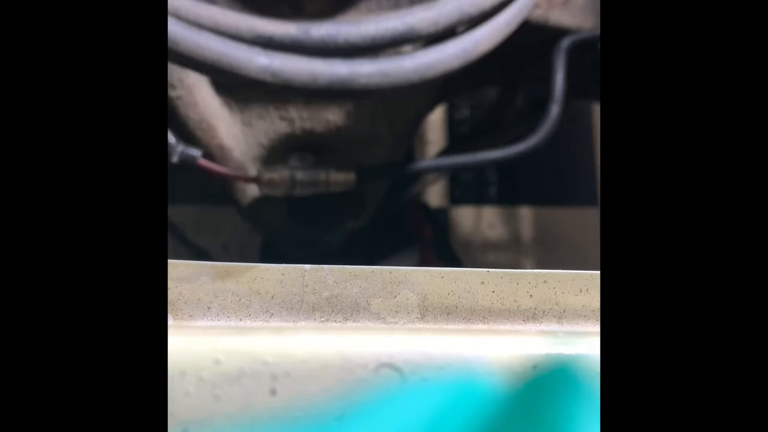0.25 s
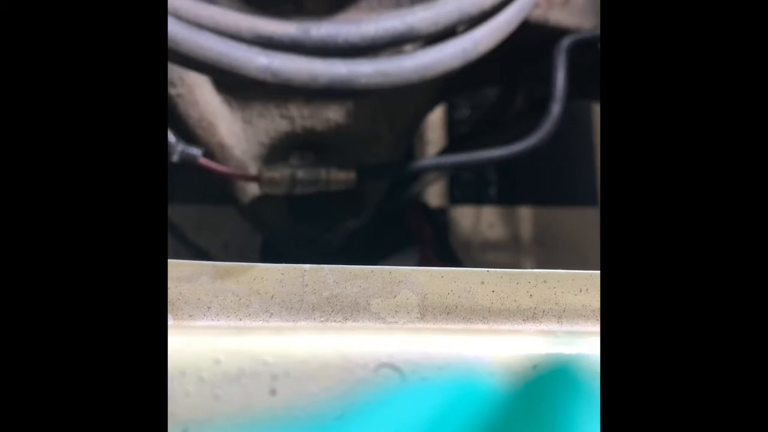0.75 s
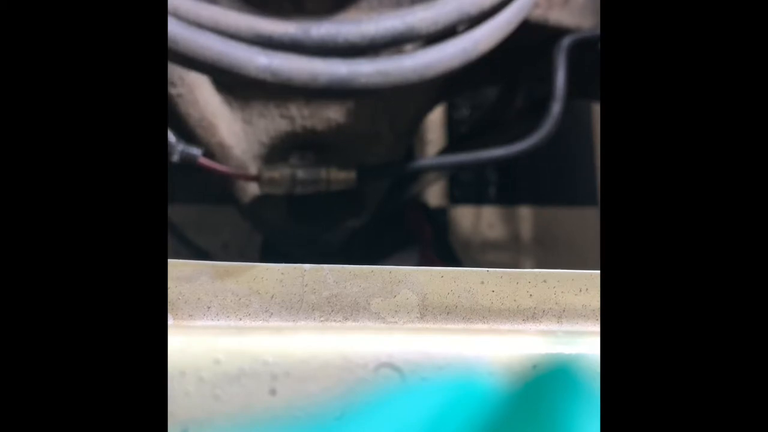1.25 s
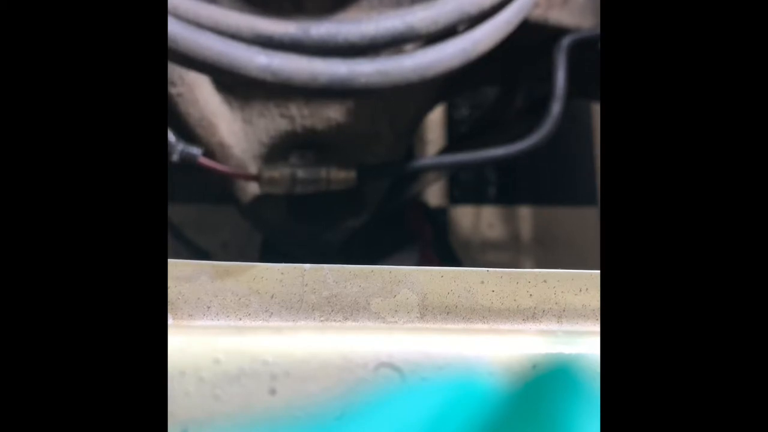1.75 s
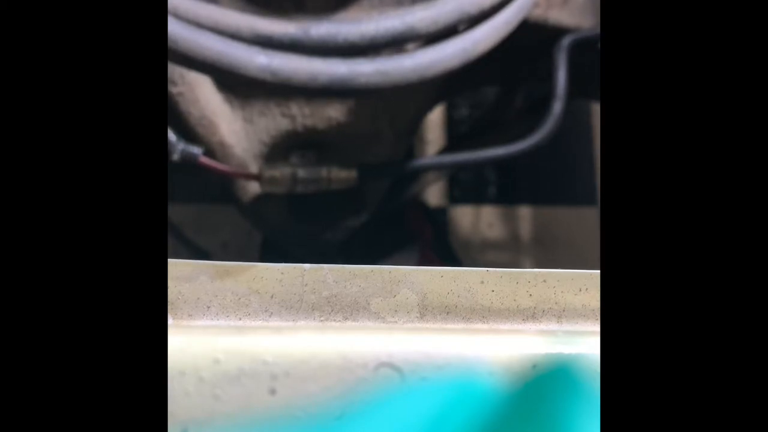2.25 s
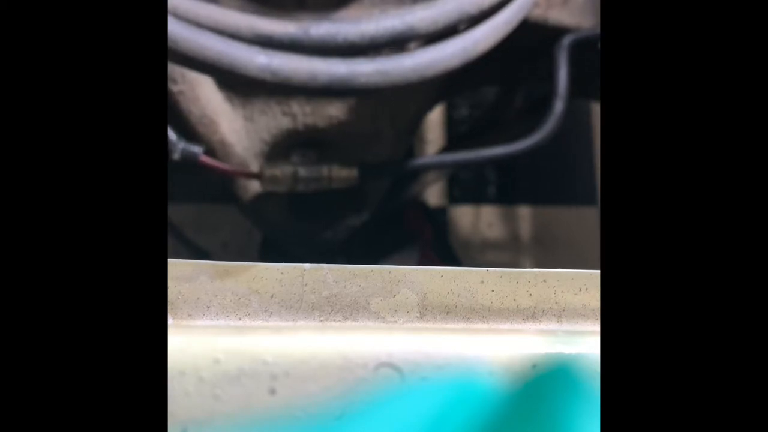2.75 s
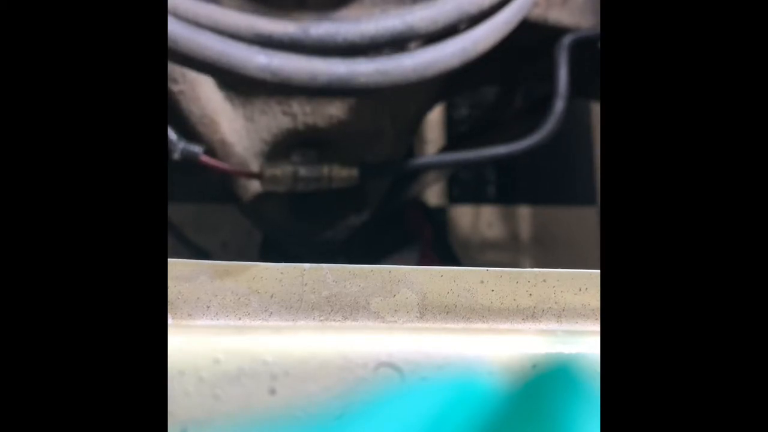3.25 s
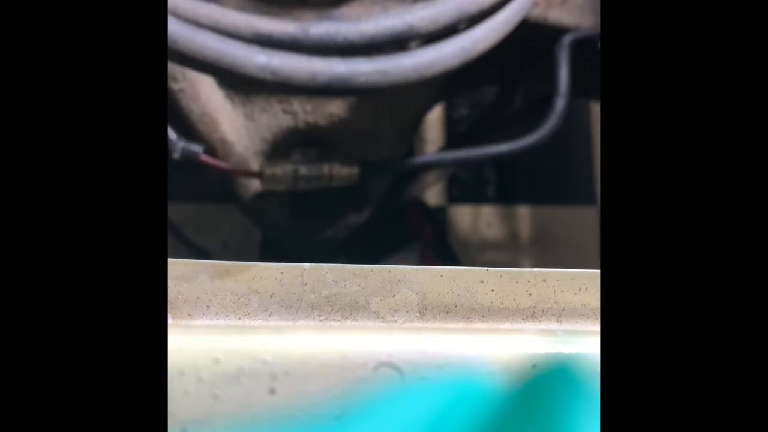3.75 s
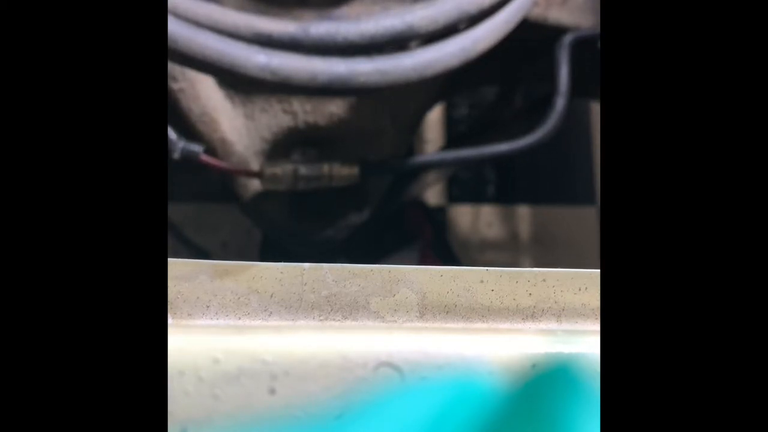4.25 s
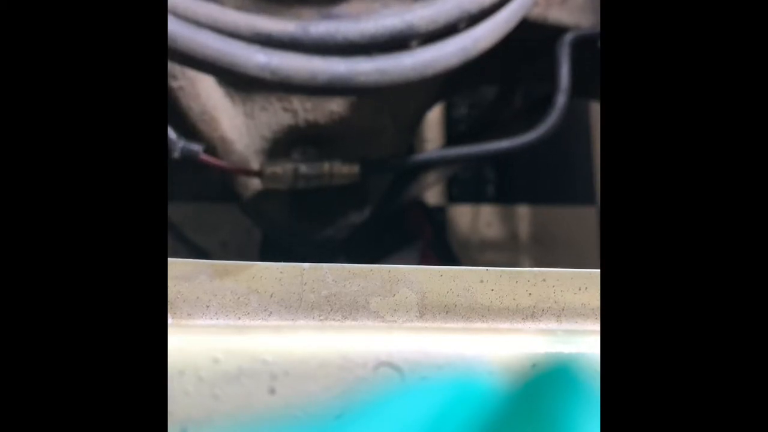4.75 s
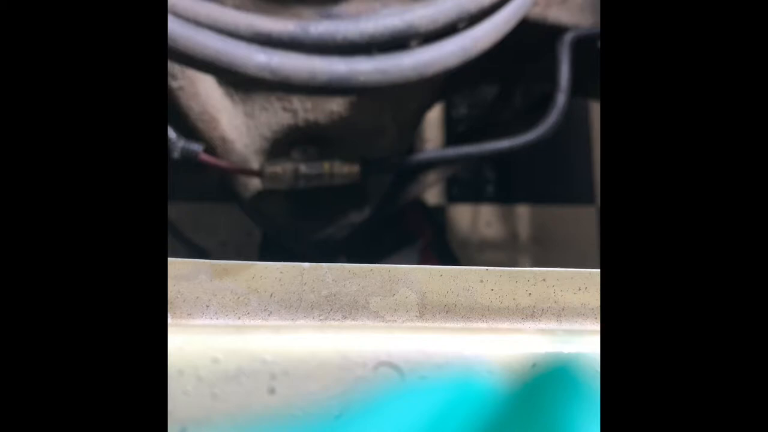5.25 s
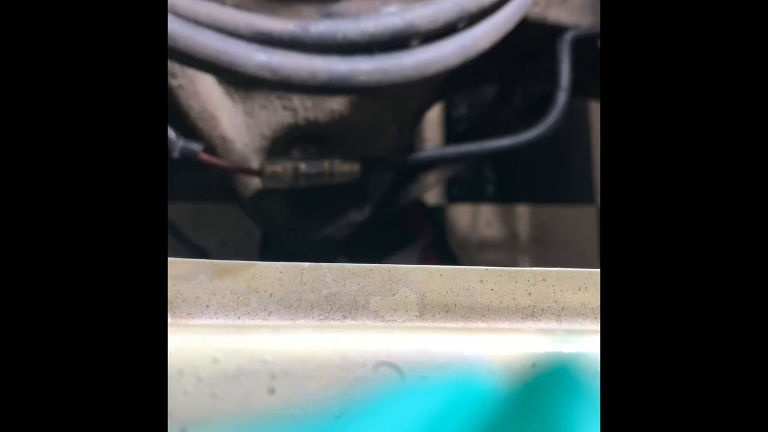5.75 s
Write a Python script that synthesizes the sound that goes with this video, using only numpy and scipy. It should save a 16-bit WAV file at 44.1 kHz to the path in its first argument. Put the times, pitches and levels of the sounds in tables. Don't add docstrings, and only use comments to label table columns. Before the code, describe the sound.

A floor jack is worked in a hard-walled garage, heard close on a phone. A faint rumble and the fading ring of an earlier blow open it. At 0.3 s a clattery knock and rub lead to a bright steel clank at 0.43, with a low spring boom; a lighter clank and firm hollow knock follow at 0.75-0.87, then hissing oil. After a lull with faint cloth rustles, a hollow knock and strong clank come at 1.55-1.65. The brightest, strongest clank lands at 2.54, followed by lighter clanks, thuds and a tiny wheel chatter near 2.8. More strong clanks fall at 3.45 and 4.3, with lighter ones at 3.75 and low thuds and a clank around 4.55-4.6. Slightly softer clanks come at 5.19 and 5.5, with a stronger oil hiss near 5.25 and a clean knock at 5.62. Scrapes, thin tube ringing and half-second reverberation link the strokes.

```python
import sys
import numpy as np
from scipy import signal
from scipy.fft import rfft, irfft
from scipy.io import wavfile
from scipy.ndimage import uniform_filter1d

SR = 44100
rng = np.random.default_rng(int(sys.argv[2]) if len(sys.argv) > 2 else 0)


def pcm_store(signal):
    levels = np.round(np.clip(np.atleast_2d(signal), -1, 1) * 32767)
    wavfile.write(sys.argv[1], SR, levels.astype(np.int16).T)


def voltage_ratio(decibels):
    exponent = np.asarray(decibels, float) / 20
    return 10 ** exponent


N = 264600


def evened(x):
    return x / np.sqrt(np.mean(x ** 2) + 1e-20)


def read(points, hz, column=1):
    rows = np.transpose(points)
    return np.interp(np.log(hz + 1), np.log(rows[0] + 1), rows[column])


def add(mix, s, sound):
    part = mix[round(s * SR):][:len(sound)]
    part += sound[:len(part)]


def filtered(x, gain):
    return irfft(rfft(x) * gain(np.fft.rfftfreq(x.shape[-1], 1 / SR)), x.shape[-1])


def mode(hz, centre_hz, width_hz):
    return 1 / (1 + 2j * (hz - centre_hz) / max(width_hz, 3))


def slips(shape, spread_db):
    return rng.standard_normal(shape) * voltage_ratio(spread_db * np.minimum(rng.exponential(1, shape), 3.5))


def drift(smooth_s):
    span = round(smooth_s * SR)
    return evened(uniform_filter1d(uniform_filter1d(rng.standard_normal(N), span), span))


def swell(start, hold, db, rise, fade):
    t = np.arange(N) / SR - start
    return voltage_ratio(db + rise * np.minimum(t, 0) - fade * np.maximum(t - hold, 0))


# f/Hz, t60/s
GARAGE = [(200, 0.99), (660, 0.55), (1700, 0.34), (4600, 0.46), (12000, 0.4)]


def garage(x):
    taps = np.zeros((2, SR))
    at = np.arange(160, SR - 20, 20) + rng.integers(0, 20, (2, (SR - 161) // 20))
    np.put_along_axis(taps, at, rng.choice([-1., 1.], at.shape), 1)
    hz, t, z = signal.stft(taps, SR, nperseg=256)
    decay = voltage_ratio(-60 * t / read(GARAGE, hz)[:, None])
    tail = signal.istft(z * decay, SR, nperseg=256)[1]
    return signal.fftconvolve(x[None], tail / np.linalg.norm(tail[0]), axes=1)[:, :N]


# t/s, hold/s, level/dB
BOOMS = [(0.369, 0.023, -40.5), (.49, 0.02, -69), (0.59, 0.1, -59), (0.795, 0.26, -69),
         (1.566, 0.043, -48.5), (1.722, 0.028, -59), (1.836, 0.2, -57), (2.105, 0.018, -56),
         (2.45, 0.11, -56), (2.533, 0.065, -43), (2.703, 0.073, -65), (2.83, 0.054, -69),
         (2.991, 0.051, -48), (3.407, 0.019, -52), (3.59, 0.22, -52), (3.888, 0.052, -49),
         (4.298, 0.035, -47), (4.394, 0.076, -60), (4.58, 0.017, -43), (4.71, 0.03, -53),
         (4.92, 0.024, -54.5), (5.288, 0.22, -55)]
BOOM_REST_DB = -62


def load():
    return voltage_ratio(BOOM_REST_DB) + sum(swell(*row, rise=500, fade=305) for row in BOOMS)


def suspension():
    boom = filtered(rng.standard_normal(N), lambda hz: mode(hz, 121.25, 17.7) ** 2)
    boom /= np.sqrt(uniform_filter1d(boom ** 2, 3000)) + 0.27 * boom.std()
    return load() * evened(boom)


# f/Hz, level/dB per Hz
HUM = [(15, -39), (25, 1), (63, 8), (114, 1.5), (248, -1), (551, -13.5), (888, -19.5), (1180, -13),
       (1430, -26), (1980, -18.5), (2560, -64), (4400, -22), (5720, -30.5), (9680, -120)]
HUM_DB, HISS_DB = -55.5, -78
STIR, STIR_FROM_DB = 0.39, -61.5


def air():
    rumble = evened(filtered(rng.standard_normal((2, N)), lambda hz: voltage_ratio(read(HUM, hz))))
    deep = filtered(rumble, lambda hz: 1 / (1 + (hz / 220) ** 3.0))
    hiss = filtered(rng.standard_normal((2, N)),
                    lambda hz: abs(1 - .6 * mode(hz, 5500, 900)) / (1 + (hz / 14300) ** 60))
    rumble = deep + (load() / voltage_ratio(STIR_FROM_DB)) ** STIR * (rumble - deep)
    return voltage_ratio(HUM_DB + 2.5 + 0.28 * drift(0.03)) * rumble + voltage_ratio(HISS_DB) * hiss


# t/s, hold/s, level/dB, fade/dB per s, valve tightness/0-1
FLOWS = [(0, 0.0215, -56.5, 99, 0.04), (.45, 0.11, -53.5, 67, 0.23), (0.799, 0.059, -44.5, 89, 0.88),
         (0.916, 0.11, -55.5, 44.5, 0.3), (1.06, 0.04, -75, 57, 0.1), (1.335, .02, -61, 150, 0),
         (1.4, 0.061, -63, 78, 0.6), (1.72, 0.062, -46, 202, .2), (1.976, 0.074, -49.5, 193.5, .9),
         (2.067, 0.092, -56.5, 121, 0), (2.164, 0.07, -65, 59.5, 0), (2.67, 0.027, -48.5, 119, 0.06),
         (2.84, 0.12, -44.5, 47, 0.5), (3.0, 0.056, -72, 97, 0.3), (3.4, 0.2, -49, 55, 0.6),
         (3.77, 0.15, -47, 98, 0.7), (4.31, 0.16, -46, 94, 0.6), (4.58, 0.02, -52.5, 207, 0.5),
         (4.72, 0.12, -51, 76, 0.6), (5.24, 0.095, -39, 249, 0.3), (5.55, 0.056, -42.5, 223, 0.6),
         (5.74, 0.071, -51, 240, 0.2)]
# f/Hz, width/Hz, level/dB, gain as the valve tightens/dB
VALVE = [(1074, 37, -1, -12.5), (1238, 143, 2.5, -9.5), (1536, 29, 0, 2), (2040, 110, -9.5, 14.5),
         (2400, 270, -12.5, 4.5), (2990, 150, -13.5, -2), (4390, 40, -6.5, 8.5)]
SEEP_DB = -89.5


def oil():
    jet = slips(N, 1.5) * voltage_ratio(2.5 * drift(0.0096))
    tight = sum(share * swell(s, hold, 0, rise=210, fade=97) for s, hold, _, _, share in FLOWS)
    tight = np.minimum(tight, 1)
    flow = voltage_ratio(SEEP_DB) + sum(swell(s, hold, db, 1300, fade) for s, hold, db, fade, _ in FLOWS)
    soft = lambda hz: 1 / (1 + (hz / 5000) ** 3)
    hiss = filtered(jet, lambda hz: .07 * mode(hz, 1500, 4000) * soft(hz))
    for f, width, db, gain_db in VALVE:
        hollow = filtered(jet, lambda hz: mode(hz, f, width) * soft(hz))
        hiss += voltage_ratio(db + gain_db * tight + 2.2 * drift(0.047)) * hollow
    return flow * evened(hiss)


# t/s, hold/s, level/dB, fade/dB per s
SCRAPES = [(0.194, 0.089, -66, 62), (0.319, .12, -57, 90), (0.528, 0.0087, -41.5, 120),
           (0.826, 0.02, -57.5, 100), (1.604, .05, -77, 57), (1.65, 0.037, -34.5, 300),
           (1.795, 0.042, -54, 95), (2.546, 0.0081, -28.5, 119), (2.72, 0.34, -60, 234.5),
           (3.264, 0.014, -59, 132), (3.656, 0.059, -61, 98), (3.736, 0.0078, -48, 607),
           (4.174, 0.56, -66.5, 97), (4.565, 0.08, -47.5, 91), (4.82, 0.13, -71, 234),
           (5.318, 0.018, -51.5, 90.5), (5.509, 0.028, -37, 353), (5.63, 0.018, -47, 603),
           (5.94, .05, -62, 102)]
# f/Hz, level/dB
SCRAPE = [(1500, 6.5), (3000, 16), (6000, 13), (9000, 2), (13800, -25), (14400, -41.5)]
SCRAPE_REST_DB = -82.5


def scraping():
    rub = voltage_ratio(SCRAPE_REST_DB) + sum(swell(s, hold, db, 700, fade) for s, hold, db, fade in SCRAPES)
    grit = slips(N, 2.1) * voltage_ratio(3.5 * drift(0.016))
    return rub * evened(filtered(grit, lambda hz: voltage_ratio(read(SCRAPE, hz))))


# t/s, level/dB
TICKS = [
    (0.428, -71),
    (1.6435, -72),
    (2.766, -53),
    (3.7534, -78),
    (4.304, -60.5),
    (4.5458, -69),
]


def ticks(mix):
    t = np.arange(4096) / SR
    for s, db in TICKS:
        puff = rng.standard_normal(len(t)) * t * np.exp(-t / .008)
        fizz = filtered(puff, lambda hz: mode(hz, 15600, 450) ** 3)
        add(mix, s, voltage_ratio(db + 13) * fizz / abs(fizz).max())


def thud(s, db, length, centre_hz):
    t = np.arange(8192) / SR
    push = rng.standard_normal(len(t)) * (t / length * np.exp(1 - t / length * 2.0))
    low = filtered(push, lambda hz: mode(hz, centre_hz, centre_hz) ** 2 * hz / (hz + 60))
    return s, voltage_ratio(db) * low / abs(low).max()


# t/s, level/dB, length/s, f/Hz
THUDS = [(2.774, -26.5, 0.038, 580), (2.799, -31.5, 0.038, 286), (2.806, -32.5, 0.034, 746),
         (2.841, -35.5, 0.017, 317), (3.258, -41.5, 0.019, 556), (4.541, -27, 0.018, 233),
         (4.56, -27, 0.017, 198), (4.578, -26.5, 0.013, 302), (4.598, -32.5, 0.011, 252),
         (4.626, -40, 0.0099, 200), (5.3, -42, 0.046, 320)]


def thuds():
    return [thud(*row) for row in THUDS]


# t/s, level/dB, f/Hz
CHATTER = [
    (2.786, -29.5, 807),
    (2.789, -35.5, 536),
]


def chatter():
    return [thud(s, db - 6, 0.0072, hz) for s, db, hz in CHATTER]


# t/s, level/dB, clatter/dB, t60/s
KNOCKS = [
    (0.329, -32, 10.5, 0.052),
    (0.872, -25.5, 4.5, 0.095),
    (1.548, -27.5, -6.5, 0.14),
    (2.064, -39, -2.5, 0.12),
    (2.489, -22.5, -3.5, 0.082),
    (2.98, -24.5, 2, 0.07),
    (3.851, -25, 2, 0.1),
    (4.705, -88, 27, 0.062),
    (5.625, -25, -9, 0.056),
]


def knocks():
    t = np.arange(16384) / SR
    played = []
    for s, db, clatter_db, t60 in KNOCKS:
        pitch_hz = 468.7 * rng.uniform(1.0, 1.02)
        note = np.sin(2 * np.pi * pitch_hz * t) * voltage_ratio(-60 * t / t60) * (1 - np.exp(-t / 0.013))
        puff = slips(len(t), 5.3) * voltage_ratio(-60 * t / 0.062) * (1 - np.exp(-t / 0.0092))
        clatter = filtered(puff, lambda hz: (mode(hz, 1600, 900) + 0.31 * mode(hz, 2300, 700))
                           / (1 + (hz / 3000) ** 2.0))
        played.append((s - .002, voltage_ratio(db) * (note + voltage_ratio(clatter_db - 3.5) * clatter)))
    return played


# f/Hz, level/dB
STEEL = [(250, -18), (500, -7.5), (1000, -4.5), (2500, 3), (4400, 0.5), (6000, -2), (8000, -5), (9000, -11),
         (11500, -7.5), (12300, -18.5), (13800, -12.5), (14300, -24), (15700, -41.5)]
# f/Hz, width/Hz, level/dB
RINGS = [(1180, 45, 0), (1500, 26, -4), (2680, 18, -2), (2840, 53, -1), (3210, 54, -3), (3660, 69, -6),
         (4300, 78, -3), (4470, 22, -4), (5640, 40, -7), (6010, 32, -6), (6780, 57, -1), (6940, 20, -1),
         (7320, 99, -4), (7780, 39, -4)]


def rattle(s, db, lean, rise, t60, curve, step=0):
    t, rise = np.arange(16384) / SR, max(rise, .001)
    growing = step + (1 - step) * (t / rise) ** curve
    dying = voltage_ratio(-60 * (t - rise) / max(t60, .01))
    envelope = np.where(t < rise, growing, dying)
    grip_db, detune = rng.standard_normal((2, len(RINGS))) * [[2.2], [.002]]
    rings = [(f * (1 + e), w, d + g) for (f, w, d), g, e in zip(RINGS, grip_db, detune)]
    clumps = evened(uniform_filter1d(rng.standard_normal(len(t)), size=130))
    drive = envelope * slips(len(t), 3.45) * voltage_ratio(2.6 * clumps)

    def body(hz):
        ringing = sum(voltage_ratio(d) * mode(hz, f, w) for f, w, d in rings)
        return voltage_ratio(read(STEEL, hz)) * lean(hz) * (hz < 15800) * (1 + voltage_ratio(0.5) * ringing)

    sound = filtered(drive, body)
    band = filtered(sound, lambda hz: (hz > 1200) & (hz < 4500))
    return s, voltage_ratio(db - 5.5) * sound / np.sqrt(uniform_filter1d(band ** 2, 300).max())


def soft_touch(s, db, low_db, hardness, rise, t60):
    edge_hz = 1300 * 2 ** hardness
    lean = lambda hz: voltage_ratio(read([(700, low_db), (1500, 0)], hz)) / (1 + (hz / edge_hz) ** 5)
    return rattle(s - .004 - 0.097 * rise, db, lean, rise, t60, curve=1.0)


# t/s, level/dB, low part/dB, hardness/0-2.4, t60/s
SLACK = [
    (1.073, -50.5, -7.5, 0.6, 0.043),
    (1.274, -89, 8, 0.83, 0.08),
    (1.334, -60.5, 21.5, 2.4, 1),
    (1.701, -36, 8.5, 1.1, 0.1),
    (1.971, -59, -31, 0.74, 0.055),
    (2.071, -40, -0.5, 0.17, 0.046),
    (2.982, -42, 1.5, 0.46, 0.087),
    (3.391, -55, 13, 0.59, 0.092),
    (4.703, -35, 11.5, 1.3, 0.059),
    (5.62, -42.5, -3, 1, 0.64),
]


def slack():
    return [soft_touch(s, db, low_db, hard, .009, t60) for s, db, low_db, hard, t60 in SLACK]


# t/s, level/dB, hardness/0-2, t60/s
RUBS = [
    (0.31, -46.5, 0.31, 1),
    (0.33, -38, 0.78, 0.1),
    (1.548, -49.5, 0.11, 0.65),
    (2.441, -52.5, 1.05, 0.53),
    (3.364, -47.5, 0.81, 0.077),
    (4.109, -53.5, 0.87, 0.66),
    (4.215, -49, 0.23, 0.072),
    (5.077, -51.5, 0.69, 1),
]


def rubs():
    return [soft_touch(s, db, 7, hard, 0.0056, t60) for s, db, hard, t60 in RUBS]


# t/s, level/dB, hardness/0-2, t60/s
LEADS = [
    (0.413, -30, 0.63, 0.24),
    (1.622, -36, 0.21, 0.17),
    (2.527, -35, 0.26, 0.066),
    (3.433, -36, 0.14, 0.084),
    (4.282, -34.5, 0.17, 0.3),
    (5.169, -32.5, 0.68, 0.037),
]


def leads():
    return [soft_touch(s, db, 5, hard, 0.01483, t60) for s, db, hard, t60 in LEADS]


# level/dB, rise/s, share struck at once/0-1
RISE = [
    (-43.5, 0.014, 0.094),
    (-43, .0062, 0.14),
    (-23, .009, 0.2),
    (-20, .012, .2),
]


def clank(s, db, low_db, top_db, air_db, rise=None, t60=0.055):
    lean = [(420, low_db - 3), (720, low_db - 2.5), (1100, low_db), (1600, 0.21 * low_db), (2400, 1.7), (3500, 0),
            (6500, top_db), (8500, top_db), (11000, air_db), (14200, air_db), (14800, air_db - 22)]
    peaks, rises, steps = np.transpose(RISE)
    rise = rise or np.interp(db, peaks, rises)
    step = np.interp(db, peaks, steps)
    return rattle(s - .2 * rise, db, lambda hz: voltage_ratio(read(lean, hz)), rise, t60, 1.8, step)


# t/s, level/dB, air/dB, rise/s
RUSTLES = [
    (0.982, -62, 3, .015),
    (1.361, -61.5, -3, 0.065),
    (1.496, -56, 3, 0.014),
    (1.83, -49.5, 5, 0.027),
    (2.104, -53, -6, 0.01),
    (2.378, -59, 5, 0.056),
    (4.19, -86, 32, .02),
]


def rustles():
    return [clank(s, db, -15.5, 1.5, air_db, rise, t60=0.15) for s, db, air_db, rise in RUSTLES]


# f/Hz, width/Hz, level/dB
TUBE = [(820, 4, -4.5), (1195, 13, -1.5), (1534, 5.3, -4), (2026, 12, -6.5), (3114, 3.8, 16.5),
        (4320, 5, 3), (7000, 7.4, -13)]


def tube(blows):
    earlier = np.zeros(SR)
    add(earlier, *clank(0.62, -29, 3, 0, 0))
    drive = np.concatenate([earlier, blows, np.zeros(SR)])
    rings = [voltage_ratio(d) * filtered(drive, lambda hz: mode(hz, f, w))[SR:SR + N] for f, w, d in TUBE]
    return sum(voltage_ratio(2.7 * drift(0.022)) * ring for ring in rings)


# t/s, level/dB, low part/dB, top part/dB, air/dB
CLANKS = [(0.211, -62.5, -8, 15, 18), (0.4285, -17, 6, 4.5, 0), (0.7443, -36.5, 14.5, -8, -41),
          (1.4093, -55, 4, -2, -4), (1.6447, -19, 7, 3.5, 0), (2.543, -15, 5.5, 5.5, 2),
          (2.77, -30, 11, 1.5, 7), (2.8647, -29.5, 12, 1.5, -41), (3.241, -51.5, 7.5, 2, 6.5),
          (3.4452, -18, 9.5, 0.5, -4), (3.7504, -27, 7.5, 1.5, -12.5), (4.0605, -61, 1, 3, 16.5),
          (4.297, -17.5, 5.5, 1.5, -1), (4.5448, -32.5, 14, -0.5, 4), (4.609, -22, 10, 1, -1),
          (4.98, -64, -8.5, 8.5, 12.5), (5.187, -22.5, 9, 0, -3.5), (5.506, -21.5, 5, -2, -4.5),
          (5.9531, -52.5, 9, -19.5, -5)]


def clanks():
    return [clank(*row) for row in CLANKS]


def scene():
    spots, near = np.zeros((3, N)), np.zeros(N)
    for k, blow in enumerate(clanks() + slack() + rubs() + leads() + rustles()):
        add(spots[k % len(spots)], *blow)
    for blow in knocks() + thuds() + chatter():
        add(near, *blow)
    hiss = oil() + scraping()
    near += tube(spots.sum(0))
    wet = sum(garage(x) for x in spots) + garage(voltage_ratio(-3.5) * hiss + voltage_ratio(-10.5) * near)
    ticks(near)
    direct = spots.sum(0) + voltage_ratio(-8.5) * hiss + near
    other_side = np.roll(direct, 61) * 0.031 - np.roll(direct, 145) * 0.3 + np.roll(direct, 233) * 0.69
    return np.array([direct, other_side]) + voltage_ratio(-0.5) * wet + suspension() + air()


def gate(dry):
    corner_hz, threshold_db, slope = 400, -54, 0.26
    upper = filtered(dry, lambda hz: 1 - 1 / (1 + (hz / corner_hz) ** 4))
    level_db = 10 * np.log10(abs(uniform_filter1d((upper ** 2).mean(0), size=1500)) + 1e-12)
    return dry + upper * (voltage_ratio(slope * np.clip(level_db - threshold_db, -12, 0)) - 1)


# f/Hz, likeness/0-1, left leads/radians
PORTS = [(60, .97, -.15), (200, .93, -.25), (430, .7, -.75), (680, .4, -1.7), (1000, .3, .9),
         (1550, .55, .5), (2100, .45, .4), (2500, .5, -2.0), (3800, .5, -1.6), (4300, .3, -2.6)]


def ports(heard):
    cross_hz, lag = 4660, 9
    hz = np.fft.rfftfreq(N, 1 / SR)
    left, other = rfft(heard) / (1 + (30 / (hz + 1)) ** 4.9)
    other = voltage_ratio(1.5) * other
    same = np.clip(read(PORTS, hz), 0, 1)
    turned = np.exp(-1j * read(PORTS, hz, column=2)) * left
    low = np.array([left, same * turned + np.sqrt(1 - same ** 2) * other])
    late = -np.exp(-2j * np.pi * hz * lag / SR)
    mid = (1 + late) / 2 * left
    side = (1 - late) / 2 * (.65 * left + .75 * other)
    share = 1 / (1 + (hz / cross_hz) ** 42)
    pair = np.sqrt(share) * low + np.sqrt(1 - share) * np.array([mid + side, mid - side])
    tilt_db = np.interp(np.arange(N) / SR, [3.97 - .2, 3.97 + 0.27], [-18.5, -6.5])
    fill = voltage_ratio(tilt_db) * irfft(abs(mode(hz, 5300, 500)) ** 2 * other, N)
    return irfft(pair, N) + fill


def low_pass(x):
    return signal.sosfilt(signal.butter(12, 15790, fs=SR, output="sos"), x)


def record(dry):
    mix = ports(gate(dry))
    return low_pass(mix)


dry = scene()
out = record(dry)
pcm_store(out)
```